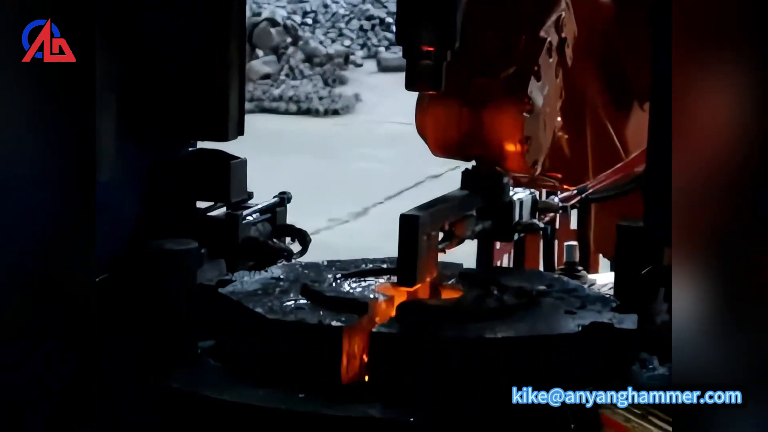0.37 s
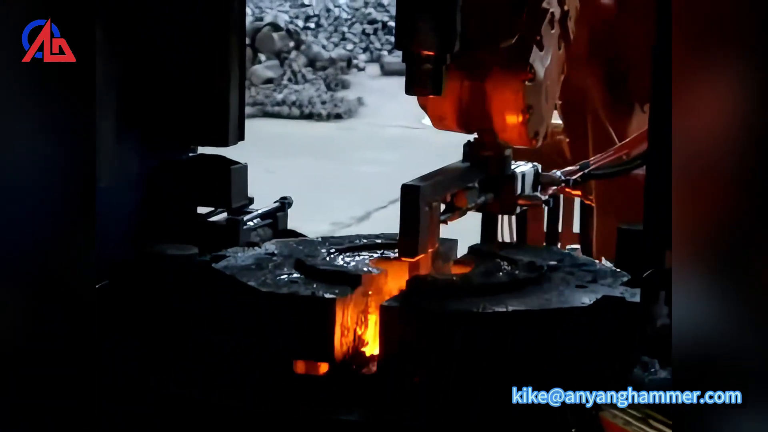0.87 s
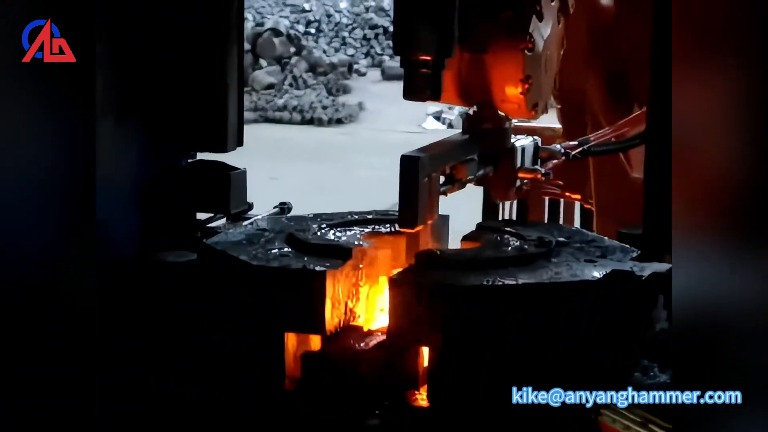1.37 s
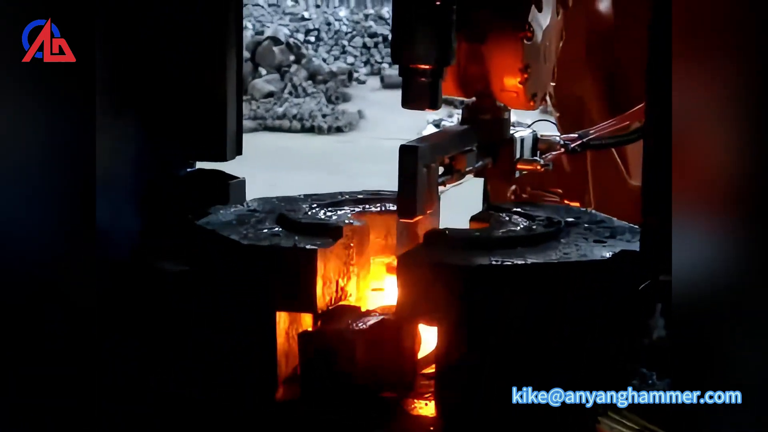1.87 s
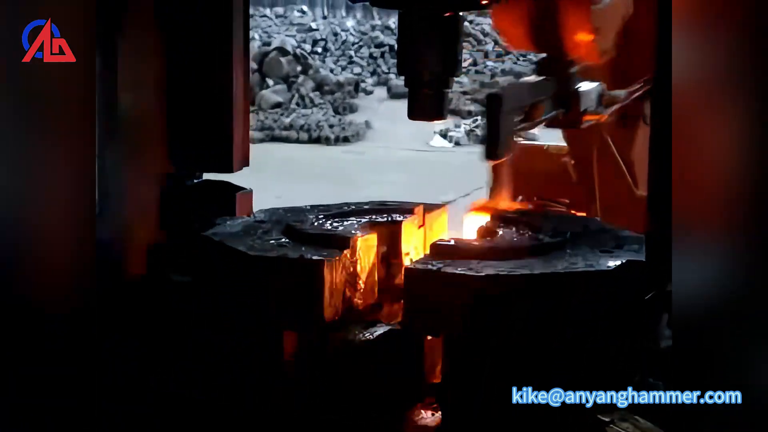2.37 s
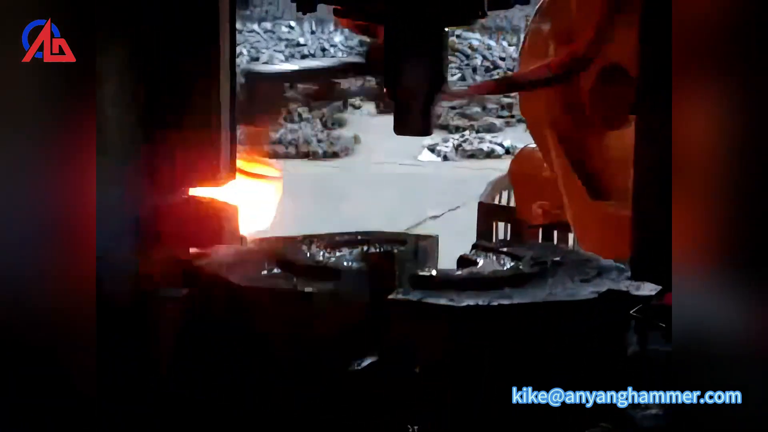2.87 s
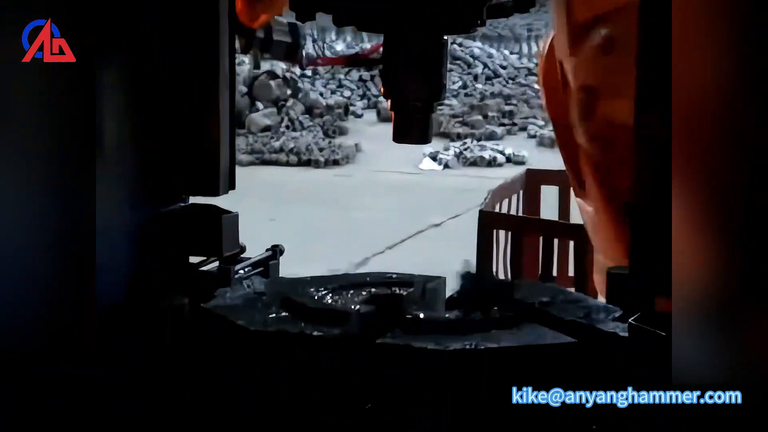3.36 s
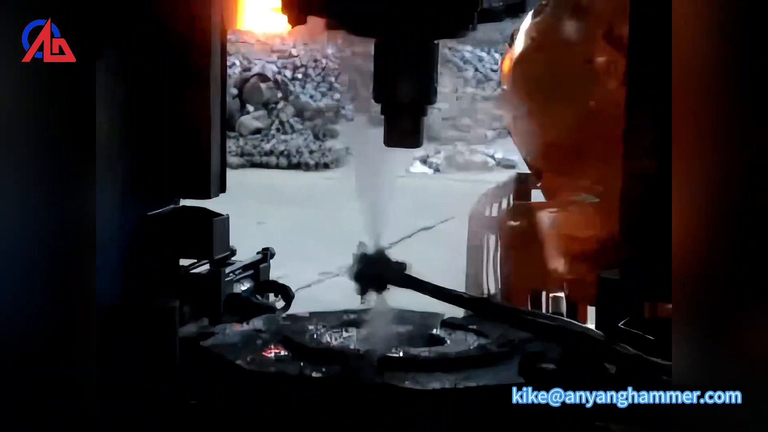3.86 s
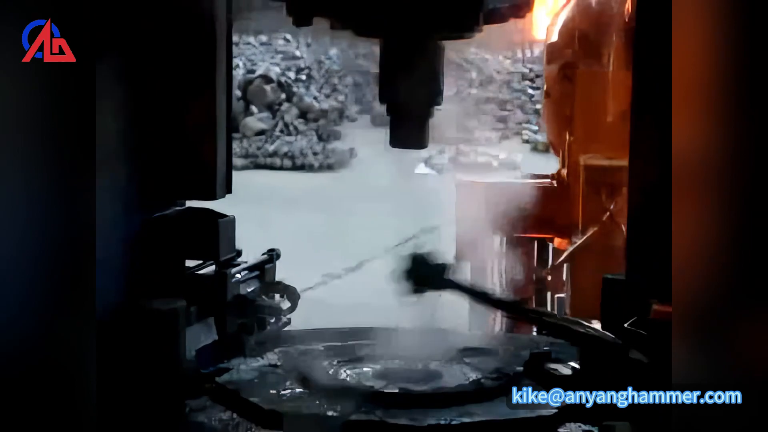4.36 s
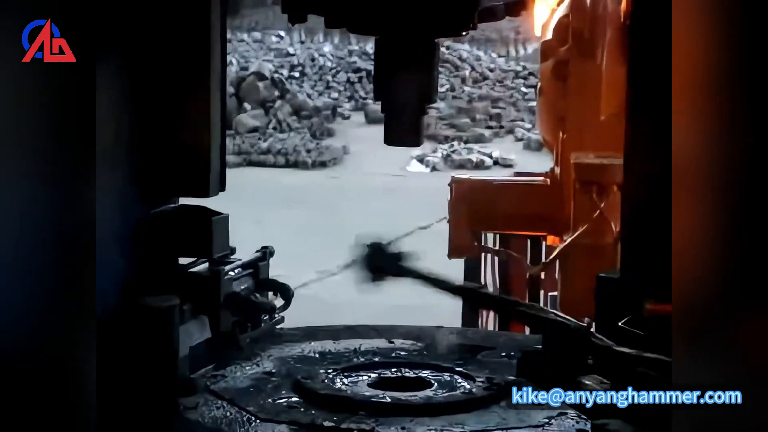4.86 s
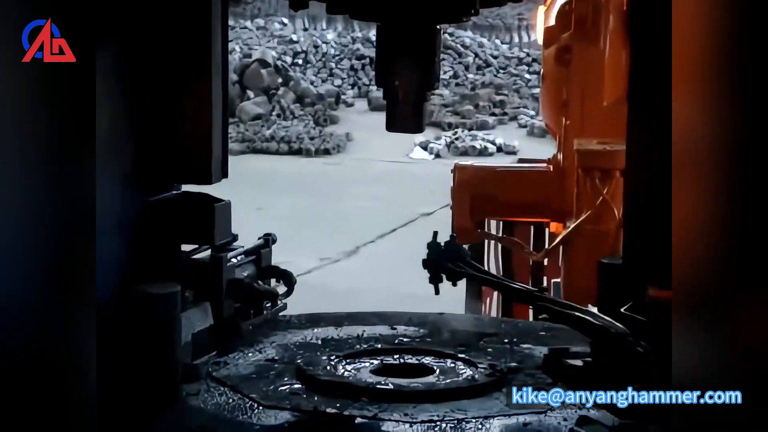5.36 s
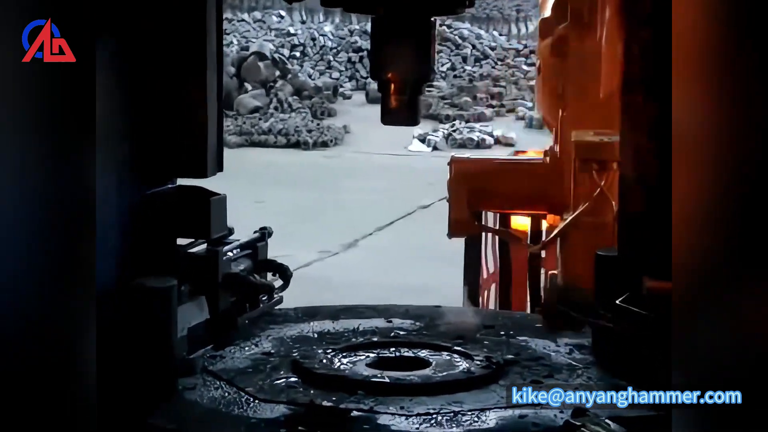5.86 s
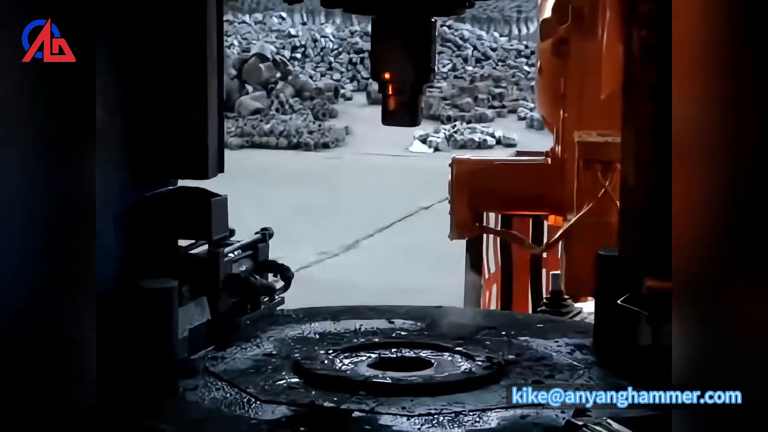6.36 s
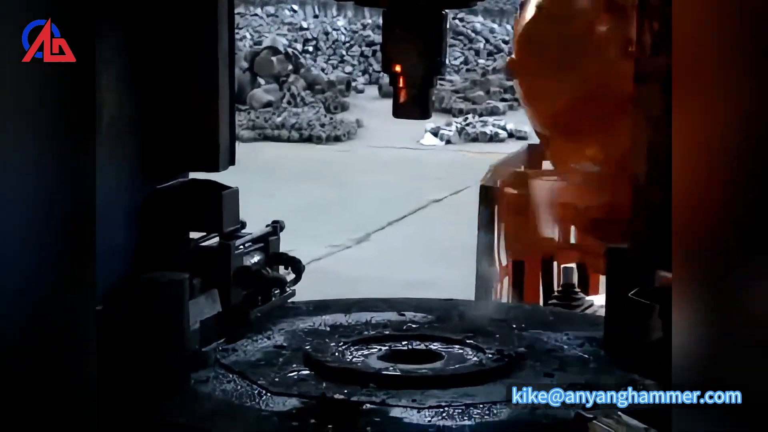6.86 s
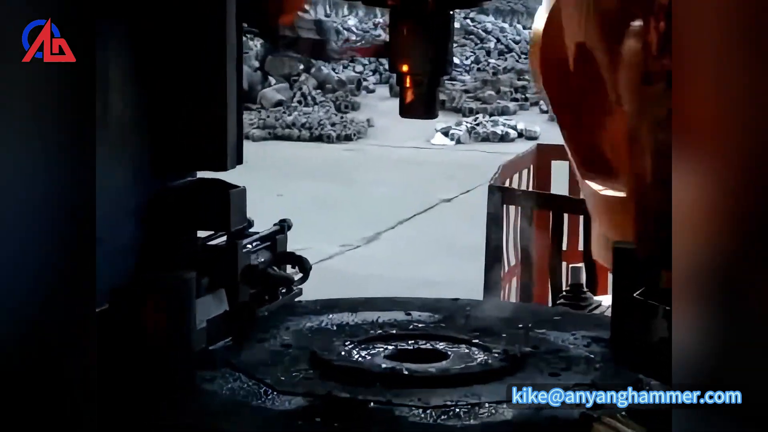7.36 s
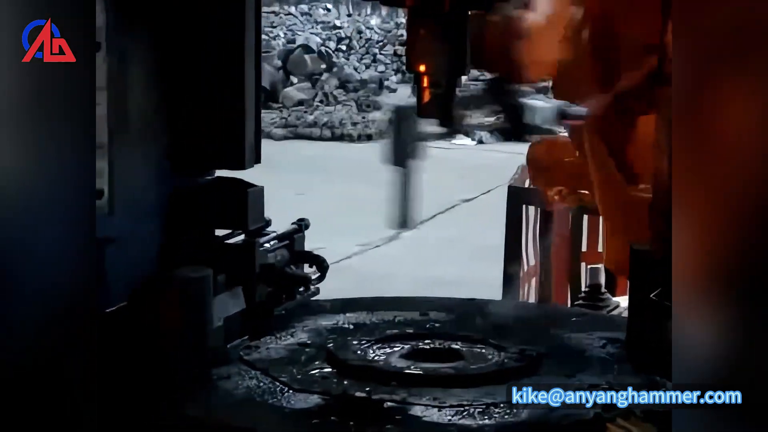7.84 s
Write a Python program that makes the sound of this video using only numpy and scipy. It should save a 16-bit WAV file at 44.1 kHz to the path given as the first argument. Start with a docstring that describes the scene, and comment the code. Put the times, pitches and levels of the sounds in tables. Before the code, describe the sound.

A forging cell in an echoing hall, picked up by a nearby phone with thin bass. Throughout, a piercing steady whine near 4.4 kHz with a higher octave rides over motor roar, a pump singing near 900 Hz, fan hiss, faint thuds and distant clatter. Spray hiss opens and stops around 0.5 s. Metal knocks rattle at 0.4, tick at 0.8 and crash in a dense cluster from 1.05 to 1.25. Spray returns at 2.05; a sharp air burst at 2.7 precedes dull knocks at 2.8. Bright knocks at 3.7 begin long spraying, with a hoarse whistle from 4 to 5 and a tick at 4.5. A very bright air puff follows at 5.0; the whine swells around 5.5. Spray and a light knock come at 6.15, a strong knock at 6.6. At 7.4 a hard crack starts steel clanks, buzzing sheet and hollow bin rumbling until 8.2. The background dips briefly at major events, then creeps back.

```python
"""Forging cell in a factory hall

Heard from a phone close by. Behind everything, motors roar and hum, a pump sings, fans hiss, far machines
clatter (coloured noise and wavering sines); a power converter whines on multiples of one tone. Valves vent and
die spray hisses (shaped noise), tooling knocks (noise cracks ringing decaying modes), and at the end a part
clanks down a steel chute and rumbles in its bin. Whine and hall dip briefly seven times and creep back."""
import sys
import numpy as np
from scipy import signal
from scipy.fft import rfft, irfft, next_fast_len
from scipy.io import wavfile
from scipy.ndimage import uniform_filter1d

SR = 44100
rng = np.random.default_rng(int(sys.argv[2]) if len(sys.argv) > 2 else 0)


def rack_gain(trim_db):
    """Turn a fader trim in dB into the linear factor to multiply a signal by."""
    fader = np.asarray(trim_db, float)
    return 10 ** (fader / 20)


def store_wav(level_fs):
    """Save 16-bit WAV to argv[1]."""
    pcm = np.round(np.clip(np.atleast_2d(level_fs), -1, 1) * 32767)
    wavfile.write(sys.argv[1], SR, pcm.T.astype(np.int16))


N = 362502
T = np.arange(N) / SR

# valves dumping their air: t/s, level/dB, hold/s, fade/s, brightness/dB per octave
VENT_BURSTS = [(2.722, -15.5, 0.085, 0.072, 3.5), (3.692, -20, 0.0039, 0.013, -7),
               (5.007, -17, 0.078, 0.072, 13)]
# nozzles spraying the dies: t/s, length/s, thin hiss level/dB, full spray level/dB, rise/s
SPRAY_BURSTS = [(-.1, 0.62, -27, -29.5, .01), (2.05, 0.89, -25, -30.5, 0.075),
                (3.671, 1.5, -24, -31.5, 0.014), (4.04, 0.91, -29.5, -23.5, 0.17),
                (6.142, .5, -24.5, -22, 0.002)]


def level(x, db):
    """Set the rms level."""
    return x * rack_gain(db) / np.sqrt(np.mean(x ** 2))


def columns(table):
    """Interpolate the columns of a time table, sample by sample."""
    s, *rest = np.transpose(table)
    return [np.interp(T, s, c) for c in rest]


def walk(rate):
    """Random levels held 1 / rate s and slewed twice; spread near 1."""
    k = int(SR / rate)
    steps = np.repeat(rng.standard_normal(N // k + 1), k)
    return 1.3 * uniform_filter1d(uniform_filter1d(steps, k), k)[:N]


def noise(shape, flicker_db=0., rate=12.):
    """Noise of a given colour, rms 1, whose third-octaves flicker on their own."""
    size = next_fast_len(N)
    third = 3 * np.log2(np.arange(size // 2 + 1) * SR / size + 1)
    hz, db = np.transpose(shape)
    edges = 3 * np.log2(hz)
    spec = rfft(rng.standard_normal(size)) * rack_gain(np.interp(third, edges, db, -90, -90))
    out = np.zeros(N)
    for b in np.arange(np.floor(edges[0]), edges[-1] + 1):
        # overlapping triangular bands
        band = irfft(spec * np.clip(1 - abs(third - b), 0, 1), size)[:N]
        out = out + band * rack_gain(flicker_db * walk(rate))
    return level(out, 0)


def ring(x, hz, t60):
    """One decaying mode excited by x, peak 1 for a unit tap."""
    pole = np.exp(2j * np.pi * hz / SR - np.log(1000) / (t60 * SR))
    return signal.lfilter([1], [1, -pole], x).imag


def tone(hz, waver_hz, waver_db):
    """A sine of rms near 1 whose pitch and strength waver."""
    phase = 2 * np.pi * np.cumsum(hz + waver_hz * walk(25)) / SR
    return np.sqrt(2) * rack_gain(waver_db * walk(15)) * np.sin(phase)


def place(out, s, sound, db):
    """Lay a sound at time s with the given peak."""
    i = int(s * SR)
    sound = sound[:N - i]
    return out + np.pad(sound * rack_gain(db) / abs(sound).max(), (i, N - i - len(sound)))


def swell(s, rise, hold, fade):
    """An envelope that rises from s, holds at 1, then dies away exponentially."""
    rise = max(rise, .001)
    fall = np.exp(-np.clip(T - s - rise - hold, 0, None) / max(fade, .005))
    return np.clip((T - s) / rise, 0, 1) * fall


def apart():
    """A faint hiss, laid in opposite sign on the two channels."""
    # f/Hz, density/dB per Hz
    apart_colour = [(130, -11.5), (400, -20.5), (1300, -19.5), (2600, -11), (4200, -7), (4800, -7.5),
                    (6500, -3.5), (7200, 6.5), (7450, -1.5), (8200, -23)]
    return rack_gain(-40.0) * noise(apart_colour, 1.2, 14.)


def thuds():
    """Heavy machines far off thud unevenly through the floor: low noise with a wandering level."""
    # f/Hz, density/dB per Hz
    thud_colour = [(110, -8), (160, -2.5), (230, 1.5)]
    return rack_gain(-48 + 6.5 * walk(12)) * noise(thud_colour)


def fans():
    """Fans hiss steadily: air noise with a flickering colour."""
    # f/Hz, density/dB per Hz
    fan_colour = [(2200, -17), (2900, -0.5), (3600, -2), (4100, 1.5), (5000, -3.5), (6400, -4),
                  (7300, -13.5), (8400, 4.5), (9900, -7.5)]
    return rack_gain(-28) * noise(fan_colour, 2.5, 30.)


def pump():
    """A pump sings on a tone and a faint one near its third multiple, over the hum of its motor."""
    # motor hum: f/Hz, level against the pump tone/dB
    motor_hum = [(300, -12), (349, -16), (393, -16)]
    song = tone(899, 1.06, 0.88) + rack_gain(-20.5) * tone(2702, 5.0, 4.7)
    return song + sum(rack_gain(db) * tone(hz, 2.53, 3.24) for hz, db in motor_hum)


def hall():
    """Motor roar, pump and distant clatter follow their own level curves over the fans and thuds."""
    # between the dips: t/s, roar level/dB, pump tone level/dB, machine clatter level/dB
    hall_levels = [(0, -26.5, -17.5, -21.5), (.8, -28.5, -21, -28), (1.0, -28, -19.5, -26),
                   (1.3, -24, -22, -24), (1.76, -26.5, -18.5, -26.5), (2.13, -26, -22, -25),
                   (2.7, -23, -22, -25), (3.34, -21.5, -21, -25.5), (4.1, -25, -23.5, -24),
                   (4.55, -25.5, -29.5, -22), (5.0, -29.5, -25.5, -25.5), (6.02, -27.5, -20.5, -26.5),
                   (6.3, -28.5, -26, -22), (7.36, -27, -21, -28.5), (7.43, -18.5, -25.5, -22),
                   (7.62, -23.5, -24, -21.5), (8.22, -14.5, -26, -20.5)]
    # motor roar: f/Hz, density/dB per Hz
    roar_colour = [(110, -42.5), (180, -20), (240, -7), (296, -1), (440, -0.5), (520, -4), (620, 2),
                   (800, 0.5), (1000, 0), (1400, -10)]
    # distant machines: f/Hz, density/dB per Hz
    clatter_colour = [(800, -14.5), (1100, -3), (1700, -3), (2300, -3.5), (3000, -13)]
    roar_db, pump_db, clatter_db = columns(hall_levels)
    roar = rack_gain(roar_db) * noise(roar_colour, 2.2, 24.)
    clatter = rack_gain(clatter_db) * noise(clatter_colour, 2.1, 35.)
    return roar + rack_gain(pump_db) * pump() + clatter + fans() + thuds()


def octave_hiss_share():
    """How far a hiss replaces the whine's octave tone, 0 to 1, timed by the sprays and vents."""
    share = sum(swell(s, 0.022, length, 0.011) for s, length, *_ in SPRAY_BURSTS)
    share = share + sum(swell(s, 0.023, hold, fade) for s, _, hold, fade, _ in VENT_BURSTS)
    return np.clip(share, 0, 1)


def whine():
    """Magnetic parts sing on multiples of the switching tone, with a faint rough skirt."""
    # pitch: t/s, f/Hz
    whine_pitch = [(0, 4401), (.6, 4399), (1.4, 4397.3), (3.6, 4397), (4.8, 4398.8), (5.7, 4400.5),
                   (8.22, 4400.5)]
    # between the dips: t/s, whine level/dB, octave level/dB
    whine_levels = [(0, -22.5, -21.5), (.11, -17, -33.5), (.39, -15.5, -26.5), (.6, -17, -22),
                    (.7, -13, -32), (.82, -17.5, -20.5), (1.1, -20, -22.5), (1.37, -24, -42.5),
                    (1.65, -22, -20.5), (1.9, -19.5, -24), (2.72, -23.5, -24), (3.25, -20, -20),
                    (3.41, -24, -19.5), (3.49, -16, -17), (4.12, -19, -24), (4.51, -25, -24.5),
                    (4.81, -23.5, -34.5), (5.05, -20.5, -18.5), (5.37, -18.5, -16.5), (5.46, -10, -20.5),
                    (5.66, -12.5, -15), (5.86, -9.5, -22), (6.57, -16, -22), (7.33, -17, -18.5),
                    (7.87, -16.5, -33.5), (8.22, -17, -20)]
    # other partials: multiple of the whine, level/dB
    whine_partials = [(.5, -33.5), (1.5, -37.5)]
    # mains ripple beside the whine: offset from it/Hz, level/dB
    ripple_sides = [(-300, -43.5), (500, -49)]
    (hz,), (db, octave_db) = columns(whine_pitch), columns(whine_levels)
    skirt = noise([(4150, -8.0), (4330, -13.0), (4400, 6.0), (4470, -18), (4520, -40.0)])
    main = tone(hz, 1.64, 1.0) + rack_gain(-11.5) * skirt
    parts = sum(rack_gain(d + 1.5 * walk(3.)) * tone(k * hz, 1.16, 2.) for k, d in whine_partials)
    parts = parts + sum(rack_gain(d) * tone(hz + off, 1.0, 4.7) for off, d in ripple_sides)
    # during sprays and vents a narrow hiss stands in for the octave tone
    hissy = octave_hiss_share()
    octave = hissy * noise([(8610, 0.013), (9045, 0.032)]) + (1 - hissy) * tone(2 * hz, 1.0, 2.06)
    return rack_gain(db) * main + parts + rack_gain(octave_db) * octave


def dips():
    """The level change in dB of whine and hall: brief dips at set moments that creep back."""
    # t/s, depth/dB, hold/s, recovery/s
    dip_times = [(0.401, 4, 0.024, 0.089), (1.045, 10.5, 0.04, 0.15), (2.735, 13.5, 0.031, 0.17),
                 (3.662, 3.5, 0.03, 0.17), (5.017, 11, 0.065, 0.26), (6.175, 2, 0.26, 0.17),
                 (7.402, 6, 0.046, 1)]
    return -sum(db * swell(s, 0.0057, hold, back) for s, db, hold, back in dip_times)


def vents(jet_colour, spray):
    """Valves vent in short bursts of jet noise, each with its own brightness, over a little spray."""
    out = np.zeros(N)
    for s, db, hold, fade, tilt_db in VENT_BURSTS:
        tilted = [(f, d + tilt_db * np.log2(f / jet_colour[0][0])) for f, d in jet_colour]
        bright = noise(tilted, 0.7, 21.67)
        out = out + rack_gain(db) * swell(s, 0.0096, hold, fade) * (bright + rack_gain(-16.5) * spray)
    return out


def whistles():
    """Nozzles whistle hoarsely: noise through one narrow resonance, with a fluttering level."""
    # t/s, length/s, f/Hz, approximate width/Hz, level/dB
    whistle_notes = [(4.003, 1, 2055, 120, -26.5), (4.396, .6, 632, 40, -34.5)]
    out = np.zeros(N)
    for s, length, hz, width_hz, db in whistle_notes:
        hoarse = level(ring(rng.standard_normal(N), hz, 2.4 / width_hz), 0)
        out = out + rack_gain(db + 1.6 * walk(30)) * swell(s, 0.21, length - .2, 0.062) * hoarse
    return out


def jets():
    """Air jets: vents, whistles, and sprays that hold but sag as the pressure falls."""
    # thin jet hiss: f/Hz, density/dB per Hz
    jet_colour = [(3000, -1.5), (4000, 2.5), (5000, 3.5), (6500, 1), (7600, 0), (8500, -13), (9900, -8)]
    # full spray: f/Hz, density/dB per Hz
    spray_colour = [(1900, -4.5), (2500, 2.5), (3300, 3.5), (4100, 4.5), (5200, -8.5)]
    sag_db_per_s, shut_s = 6.5, 0.062
    jet, spray = noise(jet_colour, 2.3, 22.04), noise(spray_colour, 2.6, 40.)
    out = vents(jet_colour, spray) + whistles()
    for s, length, jet_db, spray_db, rise in SPRAY_BURSTS:
        sag = rack_gain(-sag_db_per_s * np.clip(T - s, 0, None))
        flow = swell(s, rise, length - rise, shut_s) * sag
        out = out + flow * (rack_gain(jet_db) * jet + rack_gain(spray_db) * spray)
    return out


def knocks():
    """A blow and a short rattle of bounces: a crack of noise that also rings the tooling near its colour."""
    # t/s, peak/dB, colour centre/Hz, colour width/octaves, rattle length/s
    blows = [(0.397, -8, 950, .4, 0.0073), (0.3978, -7, 3000, 0.24, 0.05), (.402, -5.5, 1770, 0.94, 0.065),
             (0.437, -9, 1130, 0.95, 0.039), (0.827, -11.5, 1220, 0.03, 0.019),
             (1.047, -1.5, 1450, 0.82, 0.01), (1.049, -3.5, 2200, 1.4, 0.096),
             (1.065, -7, 1670, 1.3, 0.016), (1.086, -4, 1010, 0.77, 0.011), (1.096, -5, 1140, 0.95, 0.015),
             (1.126, -11, 1270, 1.1, 0.018), (1.164, -14, 1110, 0.72, 0.014),
             (1.197, -10, 1180, 0.4, 0.017), (1.259, -15, 1180, 0.31, .04), (2.827, -12.5, 810, 0.8, 0.027),
             (2.855, -16, 1400, 0.13, .04), (3.673, -3.5, 2730, 0.29, 0.012),
             (3.692, -5, 3190, 0.53, 0.015), (3.71, -12, 2580, 0.32, .015), (4.49, -8.5, 2550, 0.21, 0.012),
             (6.182, -11.5, 3500, 0.2, 0.034), (6.585, -3, 1300, 0.64, 0.034),
             (7.41, -1.5, 2820, 0.64, 0.0017), (7.412, -6.5, 3350, 1.4, 0.12),
             (7.4593, -3, 1210, 2.2, 0.038), (7.553, -16, 3500, 1.1, 0.03), (7.699, -10, 3900, 0.57, 0.041)]
    # modes: f/Hz, level/dB, t60/s
    tooling_modes = [(680, -12, 0.087), (1007, 2, 0.13), (1227, 0, 0.088), (1502, 5, 0.036),
                     (1917, 5.5, 0.047), (2510, -5, 0.1), (2920, -7, 0.099), (3500, -9, 0.09),
                     (3900, -7, 0.07)]
    out, t = np.zeros(N), T[:SR // 2]
    freq = np.arange(len(t) // 2 + 1) * SR / len(t) + 1
    for s, db, hz, octaves, length in blows:
        def near_db(f):
            return -6 * (np.log2(f / hz) / octaves) ** 2

        chance = rng.standard_normal((2, len(t)))
        # uneven taps keep up for a while, then die away
        taps = chance[0] * rack_gain(3.0 * chance[1]) * np.exp(-(t / max(length, .002)) ** 1.67)
        rings = sum(rack_gain(d + near_db(f)) * ring(taps, f, t60) for f, d, t60 in tooling_modes)
        crack = irfft(rfft(taps) * rack_gain(near_db(freq)) / np.sqrt(freq), len(t))
        # the broader the crash, the less it rings against its noise
        out = place(out, s, level(rings, -2 - 3 * octaves) + level(crack, 0), db)
    return out


def clanks(chute_modes):
    """A steel part clanks on the chute; loose sheet buzzes, every mode shaken as it rings."""
    # t/s, peak/dB, brightness/dB per octave, rise/s
    contacts = [(7.41, -11, -25, 0.002), (7.43, -14.5, -17, .003), (7.479, -15, -14, 0.0044),
                (7.557, -6, -3, 0.0055), (7.576, -6.5, -1.5, 0.0035), (7.615, -16, -12, 0.0025),
                (7.697, -8, -2, .004), (7.712, -6.5, -2.5, 0.0031), (7.729, -5, -16, 0.0035),
                (7.75, -10, -6, 0.004), (7.798, -21, -7, 0.006), (7.875, -19, -7, 0.007)]
    out, t = np.zeros(N), T[:SR // 2]
    buzz = rack_gain(6.5 * np.array([walk(120.)[:len(t)] for _ in chute_modes]))
    for s, db, tilt_db, rise in contacts:
        rings = np.zeros(len(t))
        for shake, (f, d, t60) in zip(buzz, chute_modes):
            strength = rack_gain(d + tilt_db * np.log2(f / chute_modes[0][0]))
            rings = rings + strength * np.roll(shake, int(s * SR)) * ring(t == 0, f, t60)
        # a glancing contact lets the ring build up
        out = place(out, s, rings * (1 - np.exp(-t / max(rise, .001))), db)
    return out


def drumming():
    """The part drums on the panels of the bin: a low wavering tone per panel swells at each hit."""
    # one per panel: f/Hz
    panel_hz = [559, 662, 429]
    # one list of hits per panel: t/s, level/dB, hold/s
    panel_hits = [
        [(7.42, -32, 0.018), (7.69, -19, 0.19), (7.94, -23.5, .05), (8.15, -12.5, .1)],
        [(7.49, -26.5, 0.042), (7.9, -35, 0.04), (8.0, -18, 0.05)],
        [(7.47, -22.5, 0.021), (7.56, -36, 0.034), (7.9, -21.5, 0.02), (8.02, -27.5, 0.058), (8.15, -21, 0.044)],
    ]
    out = np.zeros(N)
    for hz, hits in zip(panel_hz, panel_hits):
        beats = sum(rack_gain(db) * swell(s, 0.007, hold, 0.035) for s, db, hold in hits)
        out = out + rack_gain(1.6 * walk(40)) * tone(hz, 4.08, 1.3) * beats
    return out


def chute():
    """The part clanks down the chute, then tumbles and drums in the bin as a rumble of noise and tones."""
    # chute modes: f/Hz, level/dB, t60/s
    chute_modes = [(1387, -0.5, 0.11), (2495, -10, 0.079), (3550, -1, 0.087), (4760, -11.5, 0.15),
                   (5440, -14.5, 0.13), (6160, -10, 0.2), (6650, -15, 0.25), (6700, -29, .15)]
    # tumbling: t/s, level/dB
    tumble_levels = [(7.38, -33), (7.428, -22), (7.492, -22), (7.672, -25), (7.954, -16.5), (8.05, -22.5),
                     (8.188, -19.5), (8.22, -31)]
    # tumbling: f/Hz, density/dB per Hz
    bin_colour = [(100, -2), (150, -2), (300, -2.5), (550, 1), (800, -0.5), (1100, -10.5), (1500, -3)]
    tumble_db, = columns(tumble_levels)
    # the tumbling keeps the chute's lower modes sounding
    scrape = sum(level(ring(rng.standard_normal(N), f, t60), d - 14) for f, d, t60 in chute_modes[:2])
    rumble = drumming() + rack_gain(tumble_db) * (noise(bin_colour, 1.7, 25.) + scrape)
    fade_in = np.clip((T - tumble_levels[0][0]) / 0.097, 0, 1)
    return clanks(chute_modes) + rumble * fade_in


def echo(blows):
    """The hall's reverberation: blows convolved with decaying noise, t60 1.1 s, from 12 ms on."""
    t = T[:SR]
    tail = rng.standard_normal(SR) * np.exp(-t * np.log(1000) / 1.1) * (t > .012)
    return rack_gain(-6.5) * signal.fftconvolve(blows, tail / np.linalg.norm(tail))[:N]


def scene():
    """Blows echo in the hall; both channels hear nearly the same, but for a faint hiss."""
    steady = rack_gain(dips()) * (hall() + whine())
    blows = knocks() + chute()
    mid = steady + jets() + blows + echo(blows)
    side = apart()
    return np.array([mid + side, mid - side])


def band_limit(x):
    """A steep low-pass at the top of the band."""
    return signal.sosfilt(signal.butter(12, 10440, fs=SR, output="sos"), x)


def record(dry):
    """The phone cuts bass and top and rounds the loudest peaks."""
    x = signal.sosfilt(signal.butter(6, 150, "high", fs=SR, output="sos"), dry)
    x = np.tanh(0.72 * x) / 0.75
    x = signal.sosfilt(signal.ellip(10, .2, 80, 9950, fs=SR, output="sos"), x)
    return band_limit(x)


dry = scene()
out = record(dry)
store_wav(out)
```